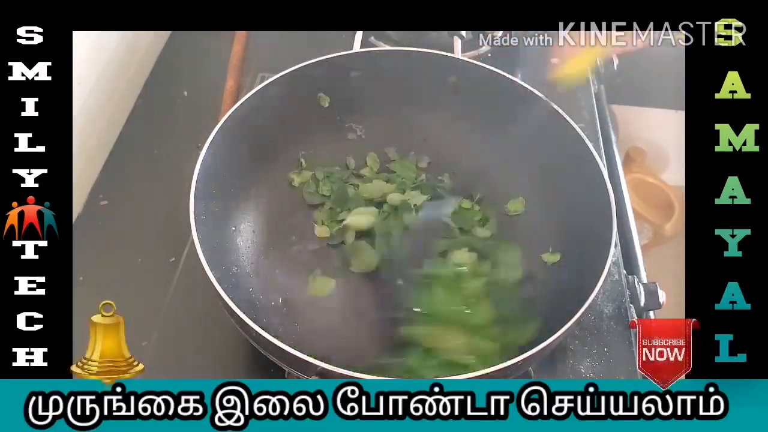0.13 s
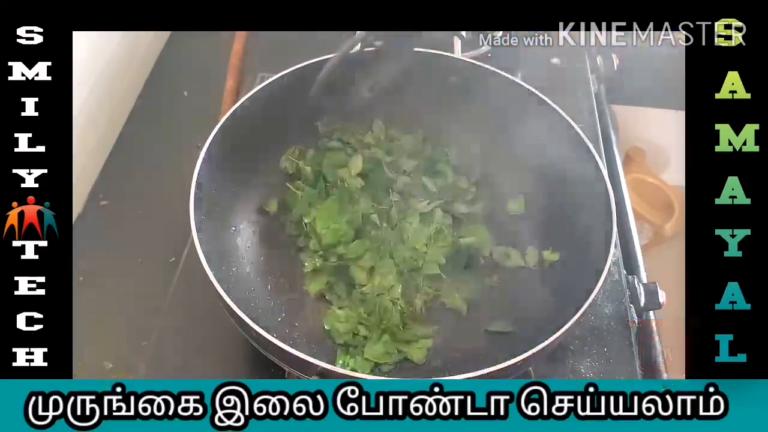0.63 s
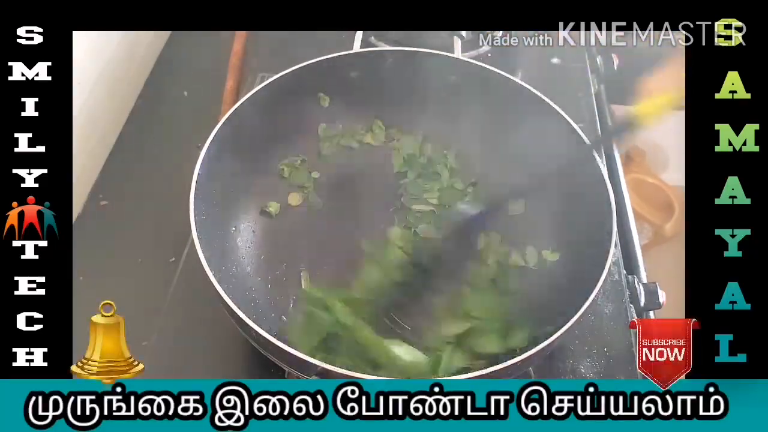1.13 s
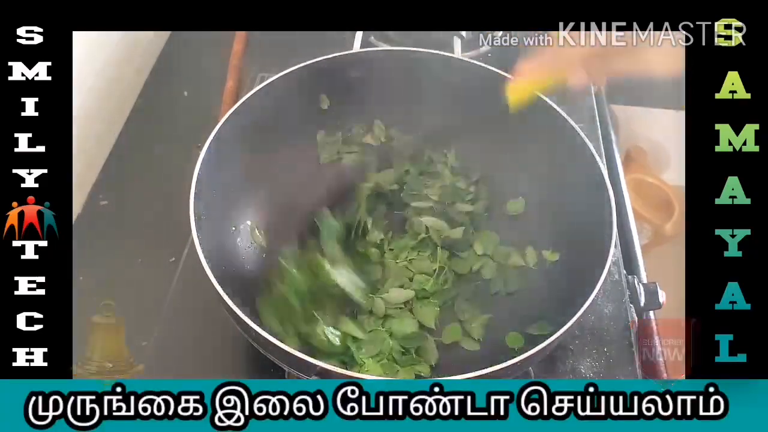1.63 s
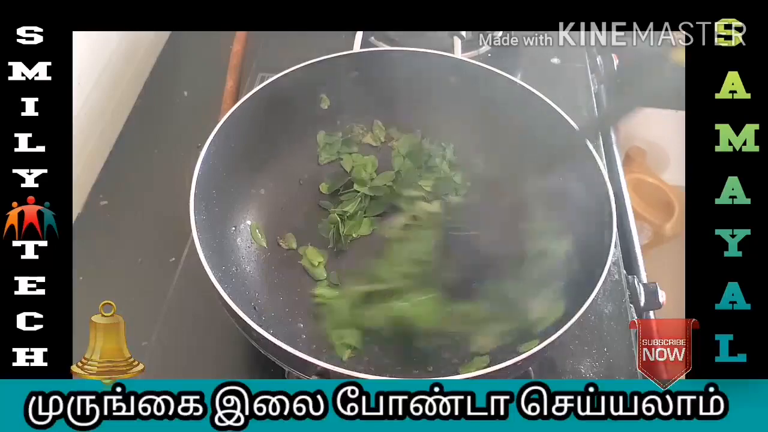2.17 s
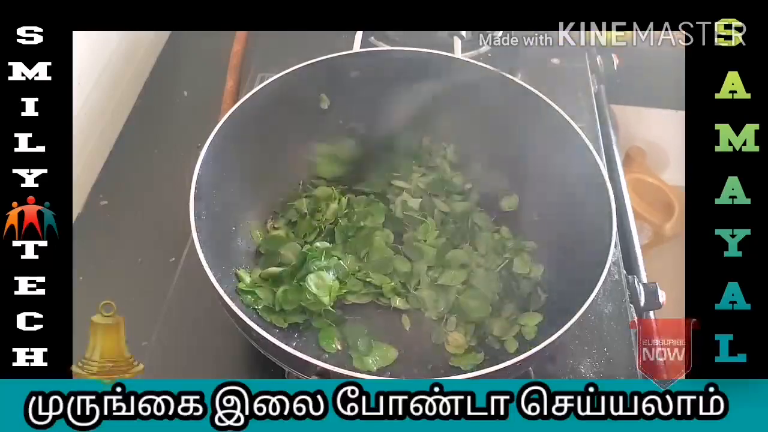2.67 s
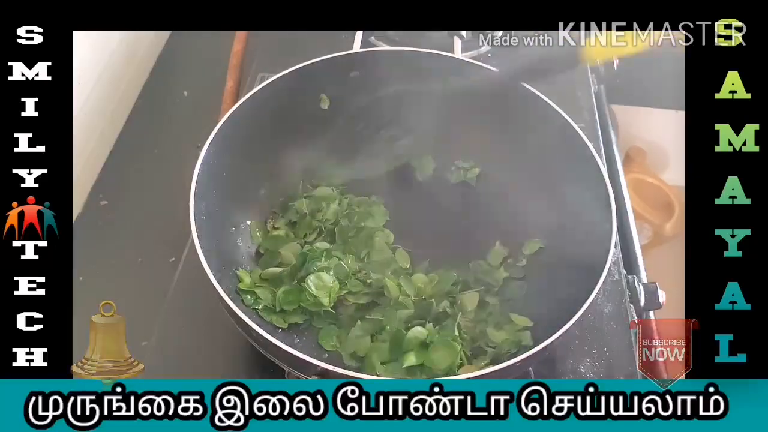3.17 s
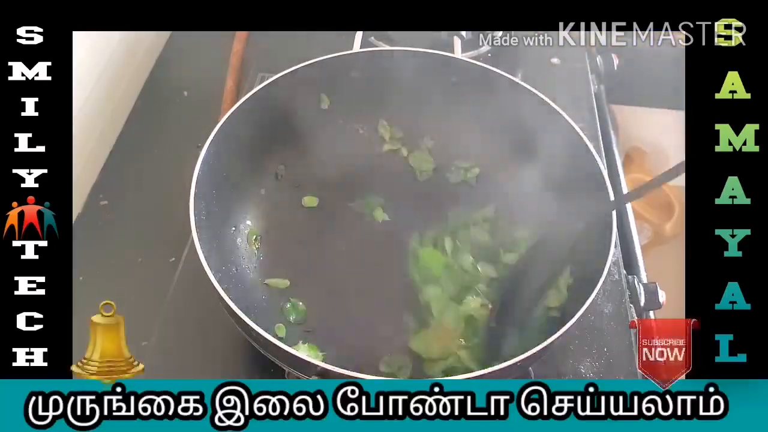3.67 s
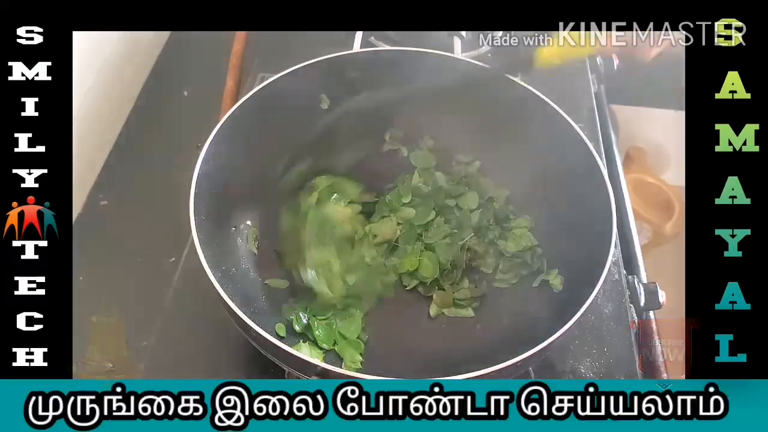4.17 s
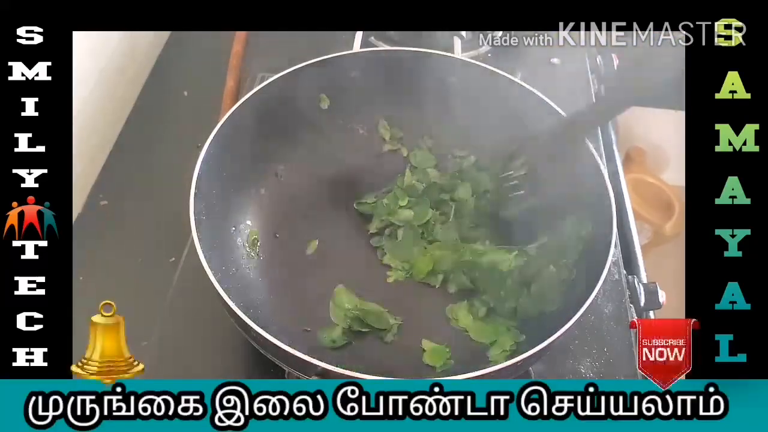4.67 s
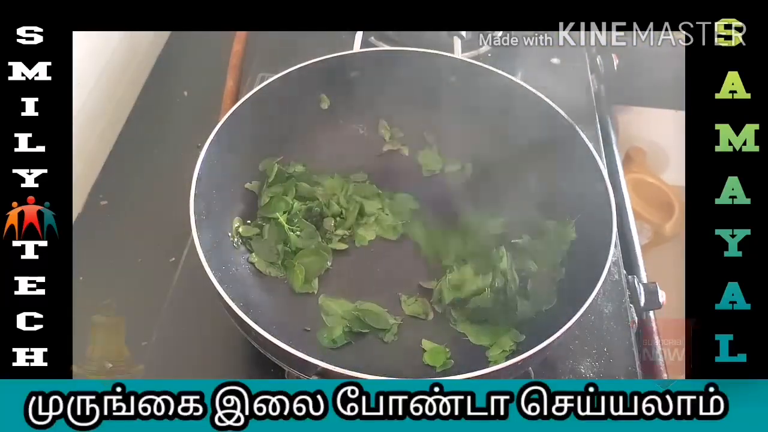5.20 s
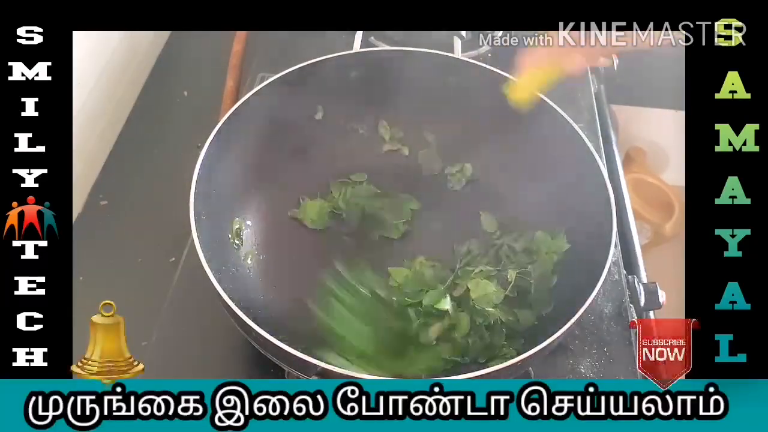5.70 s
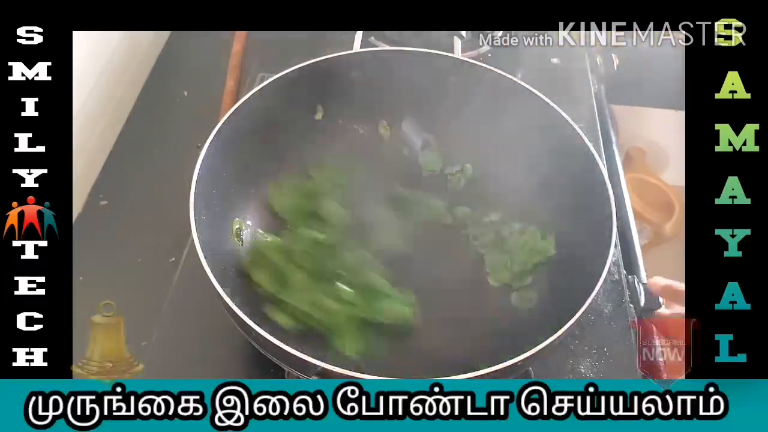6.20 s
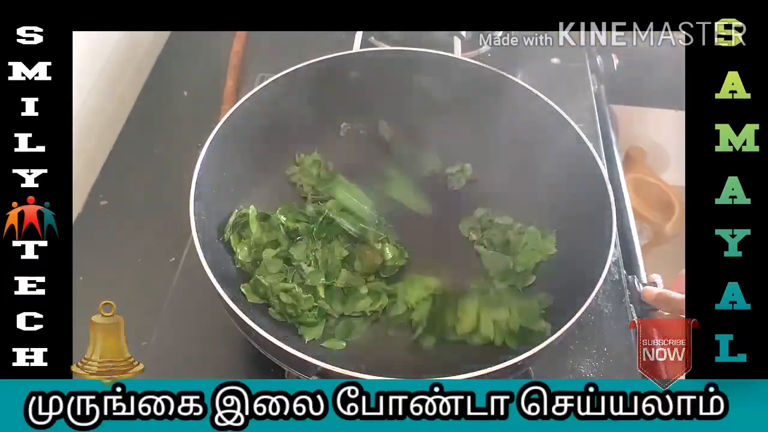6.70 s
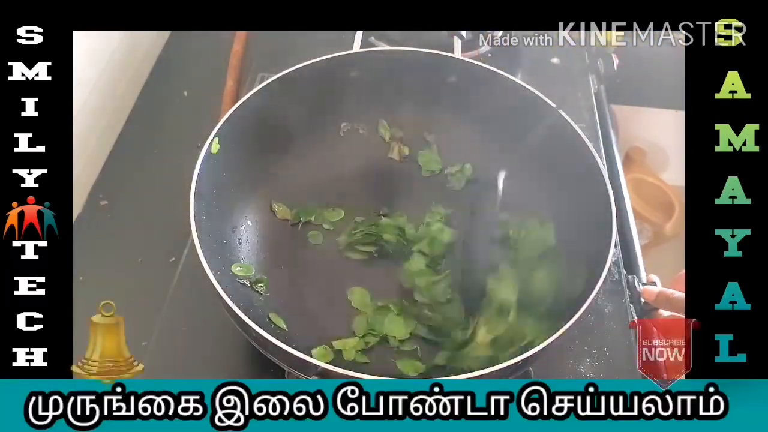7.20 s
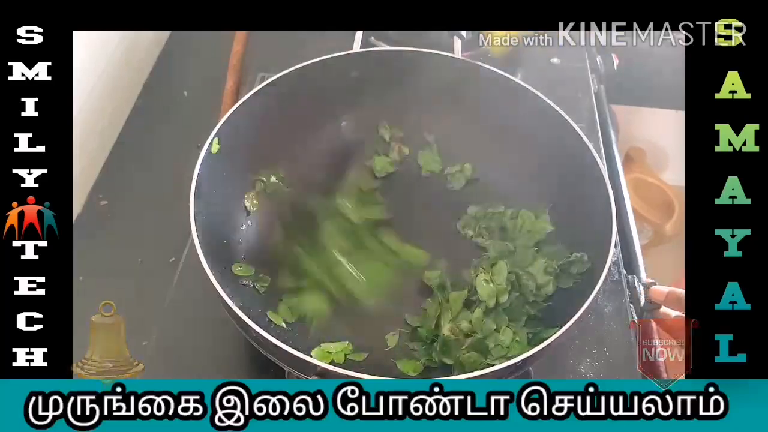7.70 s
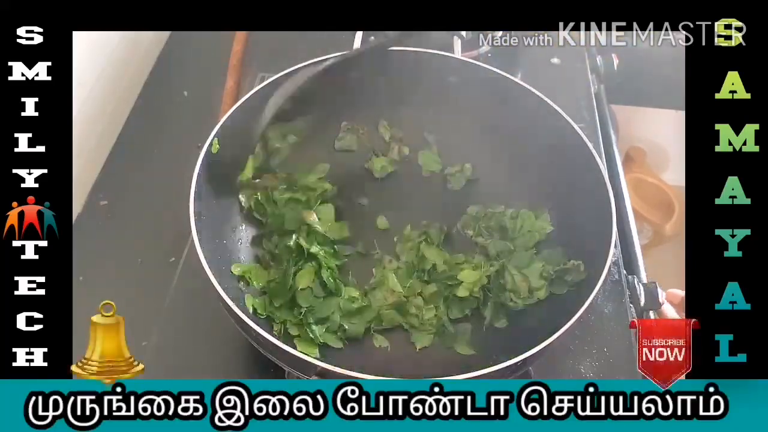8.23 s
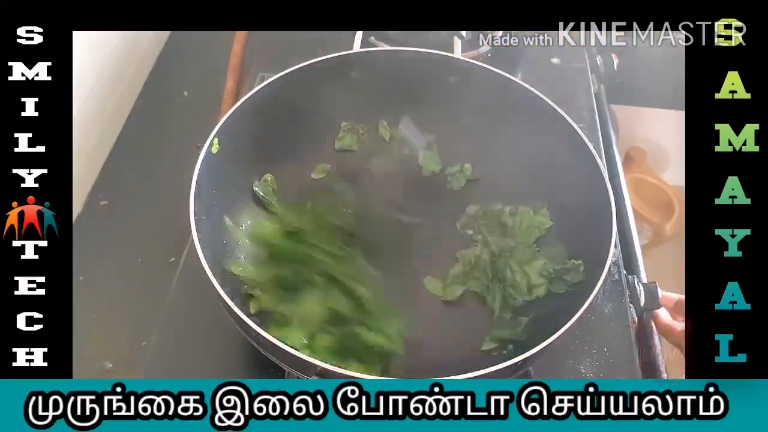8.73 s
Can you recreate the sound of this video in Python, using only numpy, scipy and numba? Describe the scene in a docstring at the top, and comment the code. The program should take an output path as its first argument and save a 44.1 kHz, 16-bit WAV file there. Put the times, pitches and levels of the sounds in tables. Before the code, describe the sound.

Bright, crackling frying of damp greens in a deep pan, metallic spatula clacks and scraping, gradually thinning, with a few dull bumps.

```python
"""Wet leaves fry in hot oil in a deep pan, close under a phone held over the stove: thousands of
short fading sines stand for bursting steam bubbles, spits and pops of oil.
A spatula stirs, scrapes and taps, and the pan drags on its grate: uneven catches and blows ring
the modes of the pan, and the walls of a small kitchen return them over a low, filtered-noise rumble.
Knocks reach the phone through its stand as short pushes that swing back."""
import sys
import numpy as np
from scipy import signal
from scipy.fft import rfft, irfft, next_fast_len
from scipy.io import wavfile
from scipy.ndimage import uniform_filter1d
from numba import njit

SR = 44100
rng = np.random.default_rng(int(sys.argv[2]) if len(sys.argv) > 2 else 0)


def bounce(signal):
    """Save signal as a 16-bit WAV file at the path given by the first command-line argument."""
    frames = np.transpose(np.atleast_2d(signal))
    limited = np.clip(frames, -1, 1)
    pcm = np.round(limited * 32767).astype(np.int16)
    wavfile.write(sys.argv[1], SR, pcm)


def volts_from_db(level):
    """Convert decibel levels to linear amplitude ratios."""
    exponent = np.asarray(level, float) / 20
    return 10 ** exponent


N = 390285
T = np.arange(N) / SR

# Frying oil. Each row: time in seconds, sizzle level in dB, coarse bubbles in dB re sizzle,
# finest bubbles in dB re sizzle.
FRYING = [(0.0, -17.5, -4.5, -5), (0.12, -20, -4, -5), (0.27, -17.5, -8.5, -5), (0.44, -19, -9, -4),
          (0.47, -17.5, -6, -7), (1.13, -19, -7, -4), (1.26, -20, -2.5, -6), (1.33, -16.5, -13, -5),
          (1.45, -19, -3.5, -6), (1.53, -17.5, -6.5, -6), (1.62, -20, -4.5, -4.5),
          (2.32, -17.5, -6.5, -5.5), (2.41, -17, -8.5, -4), (2.69, -20, -5.5, -5.5), (2.83, -16.5, -9, -7),
          (2.93, -20.5, -7, -4), (3.13, -19.5, -3, -6), (3.23, -22, -5, -3), (3.25, -23.5, -1.5, -4),
          (3.35, -26.5, -1.5, -3), (3.57, -23, -4.5, -1.5), (3.82, -27, -7, 2), (3.84, -23.5, -8.5, 1),
          (3.97, -17, -5.5, -4), (4.14, -20, -10, -4), (4.26, -22, -11, -6), (4.39, -21, -15.5, -2),
          (4.46, -21.5, -8.5, -3), (4.56, -25.5, -6.5, 0), (4.63, -22.5, -9.5, 0), (4.88, -22, -7, -1.5),
          (4.93, -20, -13, -1), (5.47, -18.5, -11.5, -3.5), (5.49, -19, -21, -4),
          (5.52, -22.5, -10.5, -1.5), (5.79, -26, -6, 3.5), (5.89, -30, -11, 5), (5.99, -33.5, -8.5, 3),
          (6.11, -32, -3.5, -3), (6.33, -25, -9.5, -1), (6.38, -26, -5.5, -1), (6.41, -21.5, -8, -8),
          (6.48, -29, -3, -7), (6.61, -23.5, -10, -6), (6.68, -25.5, -7, -9), (6.8, -26, -11, -6),
          (6.95, -27, -10, -1), (7.44, -28, -8, 0), (7.54, -22.5, -10.5, -1), (7.69, -26, -8, -4),
          (7.74, -29.5, -6, -1), (7.79, -23, -14, -7), (7.86, -23.5, -12.5, -2), (8.09, -26, -5.5, -5),
          (8.28, -21.5, -11.5, -2), (8.3, -26, -8.5, -2), (8.4, -22, -8, -4), (8.48, -25.5, -6, -3),
          (8.7, -24, -9, -1), (8.85, -23.5, -8, 0)]
# Tone of the bubbles heard from above. Each row: frequency in Hz, relative weight in dB.
SIZZLE_TONE = [(150, -50), (320, -47), (550, -22.5), (660, -23.5), (745, -16.5), (840, -20.5), (1080, -22),
               (1290, -18.5), (1450, -21), (1760, -17.5), (3030, -7.5), (3640, -7), (4880, -4),
               (5240, -4.5), (7120, -5), (10100, 2), (12800, 0.5), (14500, -1), (15600, -2)]
# Strokes that turn wet leaves into the oil, a burst of coarse bubbles each.
# Each row: start in seconds, length in seconds, level in dB.
STROKES = [(0.103, 0.066, -40), (1.26, 0.065, -21.5), (1.377, 0.22, -26), (2.1, 0.066, -31),
           (2.66, 0.017, -38), (2.979, 0.086, -27), (3.095, .1, -33), (3.257, 0.037, -25.5),
           (3.974, 0.098, -28.5), (4.455, 0.12, -33), (4.823, 0.049, -35), (6.385, 0.1, -30.5),
           (6.667, 0.11, -29), (7.29, 0.023, -36.5), (8.48, 0.1, -28.5)]
# At the phone, the level of the frying drops out for an instant just after the hardest knock.
# One row: start in seconds, length in seconds, gain in dB.
LEVEL_DIP = (5.484, 0.0089, -76)
# Stirring. Each row: time in seconds, spatula edge sliding over the pan in dB,
# rumble of pan, grate and flame in dB.
STIRRING = [(0.0, -41.5, -52.5), (0.52, -47.5, -58), (0.69, -46.5, -57), (0.98, -45.5, -54),
            (1.21, -43.5, -53), (1.38, -41, -47), (1.55, -43, -41), (1.7, -54, -50), (1.95, -44, -57),
            (2.14, -41, -47), (2.46, -47.5, -54), (2.98, -46.5, -54), (3.18, -43, -63), (3.5, -43.5, -66),
            (3.67, -46.5, -67), (3.89, -52, -72), (4.04, -45.5, -49), (4.26, -54.5, -68),
            (4.49, -56.5, -66), (4.9, -55, -47), (5.25, -51, -56), (5.54, -48.5, -44), (5.67, -49, -41),
            (5.94, -57, -55.5), (6.11, -64, -59), (6.33, -56, -55), (6.48, -49.5, -52), (6.95, -52.5, -46),
            (7.1, -51, -46.5), (7.44, -57.5, -60.5), (7.56, -52.5, -58), (7.86, -56, -51), (8.11, -56, -66),
            (8.38, -57, -59), (8.53, -48.5, -54), (8.85, -51, -60)]
# Tone of the kitchen rumble. Each row: frequency in Hz, relative weight in dB.
RUMBLE_TONE = [(18, -46), (30, 11), (90, 19), (187, 24), (247, 20), (400, 18.5), (531, 14), (800, 4),
               (1200, -6), (1540, -60)]
# Ringing modes of the pan. Each row: frequency in Hz, relative level in dB, 60 dB decay time in seconds.
PAN_MODES = [(124.8, -16.5, 0.43), (186.3, -10.5, 0.46), (315, -19.5, 0.65), (476, -10, 0.2),
             (547, -10, 0.084), (634, -8, 0.3), (772, -6.5, 0.19), (739, -4, 0.25), (852, 2.5, 0.035),
             (960, -5.5, 0.09), (1266, 0, 0.23), (1390, 13.5, 0.015), (1340, -4.5, 0.26),
             (1560, 11, 0.0032), (2080, -9, 0.019), (2460, 9.5, 0.003), (2930, 9, 0.0021)]
# Clear pops of oil. Each row: start in seconds, relative level in dB, pitch in Hz, left minus right in dB.
CLEAR_POPS = [(0.4494, -13, 4970, -1), (0.9168, -19, 3550, 0), (1.045, -8, 3610, -1),
              (1.0979, -12, 6190, -2), (1.1513, -14, 2930, -1), (1.2575, -4, 2160, 2),
              (1.3573, -3, 3190, -1), (1.4232, -10, 4830, -1), (1.7005, -19, 5990, 5),
              (2.0852, -20, 3530, -1), (2.1126, -5, 2430, 3), (2.2772, -5.5, 4440, -1),
              (2.5117, -18, 4110, 9), (2.6532, -12, 3740, 4), (2.9817, -7, 4630, -6),
              (3.252, -6, 2740, 2.5), (3.7575, -13, 3500, 0), (3.9504, -4, 5660, -0.5),
              (4.4513, -13, 6360, -8), (4.6174, -6, 6400, -3), (4.7167, -21, 3940, 0),
              (4.8499, -19, 5580, 4), (4.9677, -24, 4470, 0.0), (5.217, -4, 4360, 5),
              (5.5014, -9, 6190, -3.5), (5.6341, -18, 2610, -11), (5.671, -1.5, 5450, -1.5),
              (6.0317, -21, 4490, -4.5), (6.0646, -21, 5540, 0), (6.097, -21, 5340, 3),
              (6.1165, -21, 5310, -3), (6.3848, -17, 2460, 5), (6.4652, -13, 2300, 1.5),
              (6.5525, -8, 5810, -4), (6.6717, -14, 6120, -11), (6.986, -25, 4810, 8),
              (7.0155, -18, 5690, -5), (7.1851, -15, 5800, 9), (7.2893, -16, 5920, -1),
              (7.8296, -13, 5300, 0), (7.8855, -20, 6240, 2), (8.14, -18, 3280, -3), (8.4512, -20, 4710, 0),
              (8.4808, -6, 3060, 0.5), (8.5659, -14, 6170, -2)]
# Loud spits of oil. Each row: start in seconds, relative level in dB, centre pitch in Hz,
# left minus right in dB.
LOUD_SPITS = [(0.0904, -13, 9390, 1.0), (0.22, -13, 9500, 0), (0.495, -8, 9500, 0), (0.56, -7, 9500, 3),
              (0.566, -7, 9450, 6), (1.2575, -29, 4440, 0), (1.4108, -8, 9940, 4), (1.441, -13, 4430, 0.0),
              (1.503, -4, 10800, 1), (1.701, -3, 9700, 5), (2.4884, -6, 10500, 3), (2.6544, -11, 4400, 18),
              (2.8045, -5, 10100, -3), (3.2525, -12, 5040, -6), (3.8955, -8, 12800, 4),
              (3.9509, -1, 11000, -5), (4.6164, -5, 11500, -7), (4.7157, -5, 11900, 2),
              (5.3645, -8, 10300, 3), (5.709, -11, 10400, 0), (5.843, -13, 11000, 0),
              (6.0653, -18, 10700, 5), (6.6727, -3, 8950, -3), (6.72, -9.5, 9250, 9),
              (6.7815, -13, 9010, 4), (7.1846, -9, 11400, 8), (7.29, -16, 10600, 1.0),
              (8.3498, -7, 8360, 6), (8.594, -5, 13800, -3), (8.7151, -12, 11000, 8)]
# Firm spatula taps. Each row: time in seconds, relative level in dB, relative brightness in dB.
FIRM_TAPS = [(0.355, -36, -8), (0.497, -30, -8), (0.567, -26, -24), (0.664, -24.5, -28), (0.917, -19.5, -2),
             (0.928, -27, 1), (1.031, -30, -8), (1.1, -27.5, -20), (1.171, -24, 6.5), (1.201, -22, -27),
             (1.212, -31, -12), (1.259, -16, -13), (1.358, -20.5, 5), (1.389, -18.5, -14),
             (1.424, -21.5, 6), (1.456, -20, 4), (1.502, -20, 3), (1.701, -24, 5), (1.903, -27, -23),
             (1.965, -24, -19), (2.092, -17.5, -3), (2.115, -20, 4.5), (2.141, -21.5, 8),
             (2.654, -21, -1.5), (2.785, -27, -2), (2.984, -24.5, -17), (3.004, -19, -13),
             (3.014, -29, -13), (3.082, -26.5, -5), (3.148, -35, -6), (3.126, -20.5, 1), (3.223, -24.5, -1),
             (3.254, -16.5, 6.5), (3.425, -28, -19), (3.52, -30, -16), (3.951, -23, -1), (3.976, -23.5, 2),
             (4.452, -26.5, 6), (4.83, -29, 1), (4.895, -28, 0), (5.218, -31, 2.5), (5.634, -23, 1.5),
             (5.76, -33, 1), (6.118, -46, -9), (6.232, -42.5, -15), (6.385, -28.5, 4.5), (6.465, -48, 1),
             (6.673, -16.5, -3), (6.885, -43, -7), (7.016, -34, 3), (7.06, -36, 3.5), (7.185, -26.5, -2.5),
             (7.247, -31.5, -12), (7.449, -33, 1.5), (8.04, -34.5, 7.5), (8.14, -37, 7), (8.373, -30, 6),
             (8.482, -17.5, 1), (8.567, -24, 1.5), (8.718, -33, 0)]
# Pan dragging on its grate. Each row: start in seconds, length in seconds,
# then relative levels in dB of the deep, low, middle, upper and rim modes.
PAN_DRAGS = [(0.754, 0.13, -49, -47.5, -38.5, -42, -35.5), (.93, 0.07, -58, -48, -54, -52, -46),
             (1.2, 0.42, -65, -58.5, -56, -61, -57), (2.11, .14, -63, -49.5, -58, -54, -55),
             (3.11, .11, -79, -54, -58, -55, -51), (3.25, .22, -72, -54, -62, -56, -60),
             (4.802, 0.23, -60, -57, -52, -47, -45), (5.222, 0.22, -60, -52, -59, -47.5, -41),
             (6.31, 0.087, -65, -56, -52, -64, -56), (6.915, 0.14, -58, -50, -45, -43, -51),
             (6.94, 0.016, -43, -37.5, -50, -58, -60), (7.665, 0.07, -56, -42, -43, -45, -56),
             (7.75, 0.14, -62, -41, -50, -57, -66), (7.95, .1, -65, -53, -63, -60, -62)]
# Knocks through the stand. Each row: start in seconds, relative level in dB, pull -1 or push 1,
# left minus right in dB.
STAND_KNOCKS = [(1.503, -19.5, -1, 22), (2.003, -9.5, -1, 39), (2.0922, -18, 1, 10), (2.656, -25, -1, 1),
                (2.808, -28, 1, 0), (2.915, -26, -1, -20), (3.86, -41, 1, 3), (3.9, -35, 1, 1),
                (3.9489, -25, -1, 3), (4.06, -36, 1, 3), (4.09, -34, 1, 3), (4.25, -38, 1, 3),
                (4.35, -36, 1, 1), (4.618, -34, 1, 3), (5.4783, -3.5, -1, 2.5), (5.6653, -10, 1, 16),
                (5.931, -31.5, 1, 15), (6.016, -36, 1, 16), (6.0428, -28.5, -1, 30), (6.306, -32, 1, 8),
                (6.356, -29, 1, 8), (6.3258, -29, -1, 8), (6.386, -31, 1, 6), (6.6227, -28, 1, 6),
                (6.6727, -21, 1, 0.5), (6.858, -34, 1, 8), (6.886, -31, 1, 10), (6.949, -20, 1, 23),
                (7.1852, -21, 1, 6), (7.451, -28.5, 1, -3), (7.505, -32, 1, -2), (8.003, -30, 1, -11),
                (8.347, -33, 1, 0), (8.595, -35, 1, -2), (8.667, -37, 1, 3), (8.718, -28.5, -1, 14)]
# Swing of the stand. Each row: frequency in Hz, relative level in dB, 60 dB decay time in seconds.
STAND_MODES = [(76, 0.5, 0.096), (145, -42, 0.028)]
# The stand shudders on after two hard knocks.
# Each row: start in seconds, length in seconds, relative level in dB.
SHUDDERS = [(5.533, 0.12, -28), (5.737, .07, -44.5)]
# Rattle in the shudder. Entries: mean level in dB of its second and third multiple, re the fundamental.
SHUDDER_RATTLE = [-19, -20]


def level(x, db):
    """Scale to an rms level in dB."""
    return x * volts_from_db(db) / np.sqrt(np.mean(x ** 2))


def curve(s, db):
    """Gain along a dB curve, silent outside it."""
    out = np.zeros(N)
    span = slice(max(int(s[0] * SR), 0), int(s[-1] * SR) + 1)
    out[span] = volts_from_db(np.interp(T[span], s, db))
    return out


def burst(s, length, db, attack, release, sag_db):
    """Gain that rises 43 dB, holds while changing by sag_db per second, and falls 20 dB."""
    end = db + sag_db * length
    return curve([s - attack, s, s + length, s + length + release], [db - 43, db, end, end - 20])


def stroke_gains(sag_db):
    """One gain for each stroke of wet leaves into the oil."""
    attack_s, release_s = 0.037, 0.13
    return [burst(*row, attack_s, release_s, sag_db) for row in STROKES]


def colour(x, points):
    """Shape by (Hz, dB) points on a log axis."""
    hz, db = np.transpose(points)
    size = next_fast_len(N)
    f = np.maximum(np.arange(size // 2 + 1) * SR / size, 1)
    gain = volts_from_db(np.interp(np.log(f), np.log(hz), db))
    return irfft(rfft(x, size) * gain, size)[..., :N]


def band(x, lo_hz, hi_hz):
    """Gentle band-pass."""
    return signal.sosfilt(signal.butter(2, [lo_hz, hi_hz], "band", fs=SR, output="sos"), x)


def walk(rate):
    """Random levels, rate per second, smoothed twice; spread 1."""
    k = int(SR / rate)
    held = np.repeat(rng.standard_normal(N // k + 1), k)
    x = uniform_filter1d(uniform_filter1d(held, k), k)[:N]
    return x / x.std()


def ring(x, modes):
    """Sum of decaying modes (Hz, dB, t60) driven by x."""
    t = np.arange(SR // 2) / SR
    shape = sum(volts_from_db(db) * np.sin(2 * np.pi * hz * t) * 1000. ** (-t / t60) for hz, db, t60 in modes)
    return signal.fftconvolve(x, shape)[:N]


def blows(s, gain):
    """Single-sample blows at the given times."""
    return np.bincount(np.minimum(s * SR, N - 1).astype(int), gain, N)


def slips(rate, spread_db):
    """Stick-slip: uneven catches of an edge on a surface."""
    count = int(rate * N / SR)
    return blows(rng.random(count) * N / SR, volts_from_db(spread_db * rng.standard_normal(count)))


def chatter(hz, jitter, spread_db):
    """The pan judders on its grate: catches at a nearly even pace."""
    pace, size = rng.standard_normal((int(hz * N / SR), 2)).T
    return blows(np.cumsum((1 + jitter * pace) / hz), volts_from_db(spread_db * size))


@njit
def grains(start, hz, cycles, size, count):
    """Each grain is a sine that fades by 1 / e in its number of cycles."""
    out = np.zeros(count)
    for k in range(len(start)):
        p = np.exp((2j * np.pi - 1 / cycles[k]) * hz[k] / SR)
        z = size[k] + 0j
        for i in range(start[k], min(start[k] + int(6 * cycles[k] * SR / hz[k]), count)):
            out[i] += z.imag
            z *= p
    return out


def both_sides(s, hz, cycles, size, balance_db, lag_ms):
    """Every burst has its own lag and balance between the left and right microphones."""
    sides = []
    for side in (1, -1):
        start = np.clip((s + side * lag_ms / 2000) * SR, 0, N).astype(np.int64)
        sides.append(grains(start, hz, cycles, size * volts_from_db(side * balance_db / 2), N))
    return np.array(sides)


def sizzle():
    """Steam bubbles of all sizes burst; a few are far louder; eight groups by size seethe on their own."""
    bubbles_per_s, spread_db, cycles = 50000, 2.0, 1.7
    seethe_db, group_db = 0.84, 0.7
    when, place, luck, width, small = rng.random((5, int(bubbles_per_s * N / SR)))
    s, hz = when * N / SR, 500 * 36. ** small
    at = (s * SR).astype(int)
    group = np.array([walk(12) for _ in range(8)])[(8 * small).astype(int), at]
    db = seethe_db * walk(18)[at] + 0.5 * walk(11)[at] + group_db * group
    # big bubbles are the more uneven
    db = db - spread_db * (1 + .5 * (small < .6)) * np.log(luck + 1e-4)
    # small bubbles are brief, so they need more size for an even spectrum
    size = volts_from_db(db) * hz
    x = both_sides(s, hz, cycles * (.5 + width), size, 6 * (place - .5), .3 * (place + luck - 1))
    x = colour(x, SIZZLE_TONE)

    # stirring changes the share of big, middle and fine bubbles
    coarse = colour(x, [(5400, 0), (6200, -6), (7400, -40)])
    fine = colour(x, [(11000, -40), (12300, -6), (13200, 0)])
    middle = x - coarse - fine
    t, fry_db, coarse_db, fine_db = np.transpose(FRYING)
    stroke_power = sum(gain ** 2 for gain in stroke_gains(-64))
    coarse_gain = np.sqrt(curve(t, fry_db + coarse_db) ** 2 + stroke_power)
    return (level(middle, 2.1) * curve(t, fry_db) + level(fine, 3.4) * curve(t, fry_db + fine_db)
            + level(coarse, 0.79) * coarse_gain)


def level_dip(x):
    """At the phone, the level of x drops out for an instant, at a set time."""
    s, length, db = LEVEL_DIP
    return x * volts_from_db(np.interp(T, [s - .003, s, s + length, s + length + 0.0076], [0, db, db, 0]))


def kitchen():
    """Low rumble of flame, grate and room: shaped noise, partly alike on both sides."""
    mid, left, right = rng.standard_normal((3, N))
    rumble = colour(mid + 0.83 * np.array([left, right]), RUMBLE_TONE) * volts_from_db(3.1 * walk(13))
    t, _, rumble_db = np.transpose(STIRRING)
    return level(rumble, 0.74) * curve(t, rumble_db)


def scrape():
    """The spatula edge slides over the pan: uneven catches ring its modes."""
    t, slide_db, _ = np.transpose(STIRRING)
    return level(ring(band(slips(700, 9.2), 318, 1930), PAN_MODES), 2.5) * curve(t, slide_db)


def crackle():
    """Lone pops of oil, one sharp cycle each; besides the clear ones, many come at random."""
    crackles_per_s, base_db, spread_db = 160, -2.5, 3  # base re the coarse bubbles
    when, luck, pitch, place = rng.random((int(crackles_per_s * N / SR), 4)).T
    when = when * N / SR
    t, fry_db, coarse_db, _ = np.transpose(FRYING)
    db = np.interp(when, t, fry_db + coarse_db) + base_db - spread_db * np.log(luck + 0.00081)
    lone = np.c_[when, db, 1500 * 4.5 ** pitch, 8 * (place - .5)]
    s, db, hz, balance_db = np.r_[CLEAR_POPS, lone].T
    lag_ms = -.05 * np.clip(balance_db, -6, 6)
    pops = both_sides(s, hz, 0 * s + 0.91, volts_from_db(db + 2), balance_db, lag_ms)
    return band(pops, 680, 15000)


def rustle():
    """Leaves tick over the pan at every stroke: stick-slip catches, partly alike on both sides."""
    ticks = band(np.array([slips(200, 4.5), slips(200, 4.5)]) + slips(150, 4.5), 1100, 4500)
    return level(ticks, -4) * sum(stroke_gains(-34))


def spits():
    """Water drops explode in the oil: short clusters of bursts round one pitch; small ones come at random."""
    small_per_s, small_db = 16, 10.5  # relative level of the largest small spits, re the sizzle
    when, size, pitch, place = rng.random((int(small_per_s * N / SR), 4)).T
    when = when * N / SR
    t, fry_db = np.transpose(FRYING)[:2]
    small_level = np.interp(when, t, fry_db) + small_db - 8 * size
    small = np.c_[when, small_level, 6000 * 2.2 ** pitch, 8 * (place - .5)]
    s, db, hz, balance_db = (np.repeat(c, 6) for c in np.r_[LOUD_SPITS, small].T)  # six bursts a spit
    late, tune, lag = rng.random((len(s), 3)).T
    hz = np.minimum(hz * 2 ** (0.52 * (tune - .5)), 15000.)
    size = volts_from_db(db + 7.5 - 2.0 * late)
    x = both_sides(s + .0015 * late, hz, 1.0 + late, size, balance_db, 1.8 * (lag - .5))
    return band(x, 2700, 18600)


def taps():
    """Firm and light spatula blows ring the pan; brighter ones drive its higher modes more."""
    light_per_s, light_db = 9, -1  # relative level of the firmest light taps, re the sliding edge
    deep_db, crack_db, bounce_s = -8, -1, 0.008815
    t, slide_db, _ = np.transpose(STIRRING)
    s, db, bright_db = np.transpose(FIRM_TAPS)
    when, size, bright = rng.random((int(light_per_s * N / SR), 3)).T
    when = when * N / SR
    s, bright_db = np.r_[s, when], np.r_[bright_db, -16 * bright]
    db = np.r_[db, np.interp(when, t, slide_db) + light_db - 8 * size]
    parts = ((0, 450, 1800), (bright_db + 5.5, 1700, 4500), (deep_db, 140, 450))
    push = sum(band(blows(s, volts_from_db(db + rel)), lo, hi) for rel, lo, hi in parts)
    lag = int(bounce_s * SR)
    push[lag:] += 0.12 * push[:-lag].copy()  # the blade bounces once
    # first touch of the edge, before the pan rings
    crack = band(blows(s, volts_from_db(db + crack_db + .3 * bright_db)), 1200, 7000)
    return volts_from_db(-11) * ring(push, PAN_MODES) + volts_from_db(12) * push + crack


def singing(lo, hi):
    """Steady rubbing locks on to the longer modes: sines that waver in level and drift in pitch."""
    waver_db, drift = 2, .015  # drift is the share by which the pitch wanders
    out = 0
    for hz, db, t60 in PAN_MODES:
        if lo < hz < hi and t60 > .1:
            gain = volts_from_db(db + waver_db * walk(25))
            out = out + gain * np.sin(2 * np.pi * hz * np.cumsum(1 + drift * walk(12)) / SR)
    return out


def drags():
    """The pan drags on its grate: catches and judder ring, sing and rasp in five groups of modes."""
    attack_s, release_s = 0.02, 0.044
    low_sag, high_sag = -26, -50  # dB per second
    catches = slips(660, 0.89)
    rough = catches + 4 * chatter(157, 0.0291, 3.3)
    parts = ((catches, 100, 150, low_sag), (catches, 150, 250, low_sag), (rough, 250, 400, high_sag),
             (rough, 400, 670, high_sag), (rough, 745, 820, high_sag))
    out = np.zeros(N)
    for k, (x, lo, hi, sag_db) in enumerate(parts):
        gain = sum(burst(s, length, db[k], attack_s, release_s, sag_db) for s, length, *db in PAN_DRAGS)
        rub = band(band(x, lo, hi), lo, hi)
        rasp = level(rub, -7.5)  # broad, between the modes
        out += gain * (level(ring(rub, PAN_MODES), -3.9) + level(singing(lo, hi), -6.5) + rasp)
    return out


def knocks():
    """A short push or pull on the phone body and its swing back, unequal at the two microphones."""
    push_ms, swing_db_per_db = 2.14, 1.8  # softer knocks swing back less
    bass_cut_hz, cut_db_per_db = 14, .6  # cut at 0 dB; softer knocks carry less deep bass
    out, t = np.zeros((2, N)), np.arange(SR // 8) / SR
    push = np.sin(np.pi * np.clip(t * 1000 / push_ms, 0, 1) ** 0.4) ** 1.36
    back = sum(volts_from_db(g) * np.sin(2 * np.pi * hz * t) * 1000. ** (-t / t60) for hz, g, t60 in STAND_MODES)
    for s, db, way, balance_db in STAND_KNOCKS:
        i = int(s * SR)
        share = 2 / (1 + volts_from_db(np.array([[-balance_db], [balance_db]])))
        motion = push - volts_from_db(swing_db_per_db * db) * back
        motion = band(motion, bass_cut_hz * volts_from_db(-cut_db_per_db * db), 9000)
        wave = (np.sign(way) * volts_from_db(db) * share * motion)[:, :N - i]
        out[:, i:i + wave.shape[1]] += wave
    return out


def shudder():
    """The stand shakes at a wandering pitch with two rattling multiples, stronger on the left."""
    shake_hz = 100
    turn = 2 * np.pi * np.cumsum(shake_hz * (1 + 0.0123 * walk(18))) / SR
    shake = np.sin(turn)
    for k, db in enumerate(SHUDDER_RATTLE):
        shake = shake + volts_from_db(db + 3.2 * walk(30)) * np.sin((k + 2) * turn)
    gain = sum(burst(*row, 0.024, .012, -10) for row in SHUDDERS)
    return shake * gain * np.array([[1.3], [.7]])


def scene():
    """Pan sounds come back from the hard walls of a small kitchen, with oil, knocks and rumble around them."""
    left_db = 0.5  # the pan stands a little to the left
    oil = level_dip(sizzle()) + spits() + crackle() + rustle()
    oil = oil * volts_from_db(np.array([[left_db], [-left_db]]) / 2)
    metal = scrape() + taps() + drags()
    t = np.arange(SR // 4) / SR
    walls = rng.standard_normal((2, len(t))) * 1000. ** (-t / 0.096) * (t > .0008)
    walls = walls / np.sqrt(np.sum(walls ** 2) / 2)
    echo = signal.fftconvolve(metal[None], walls, axes=1)[:, :N]
    return oil + volts_from_db(0.5) * metal + volts_from_db(-3.5) * echo + knocks() + shudder() + kitchen()


def roll_off(x):
    """The treble ends steeply here."""
    return signal.sosfilt(signal.butter(12, 15800, fs=SR, output="sos"), x)


def record(dry):
    """The phone cuts the top above 15450 Hz and clips whatever passes full scale."""
    cut = signal.sosfilt(signal.ellip(10, .2, 80, 15450, fs=SR, output="sos"), dry)
    mix = np.clip(cut, -1, 1)
    return roll_off(mix)


dry = scene()
out = record(dry)
bounce(out)
```